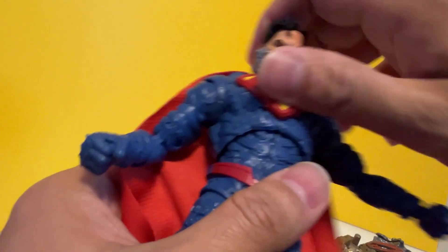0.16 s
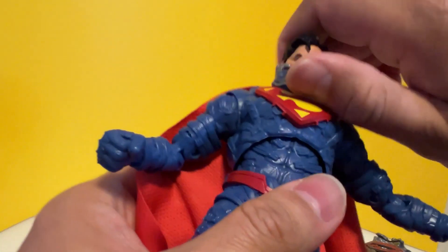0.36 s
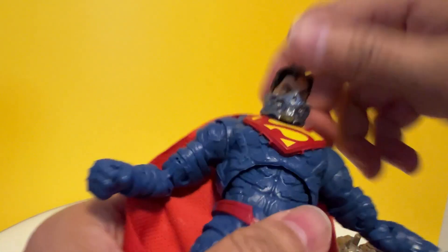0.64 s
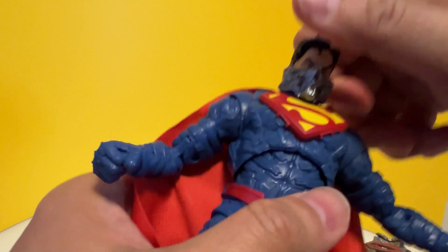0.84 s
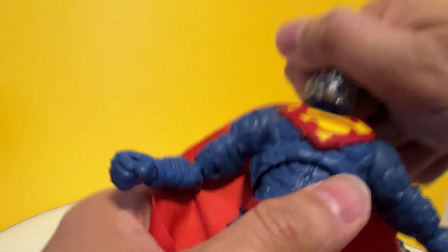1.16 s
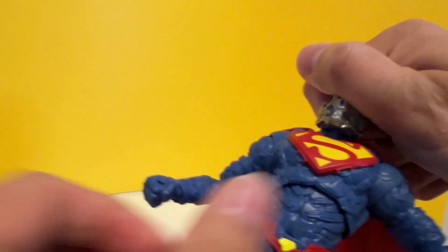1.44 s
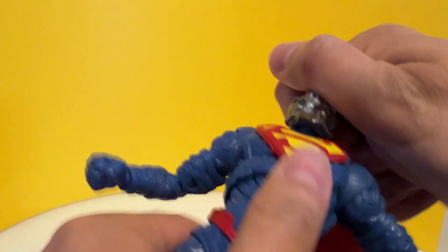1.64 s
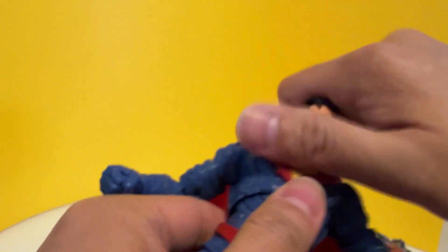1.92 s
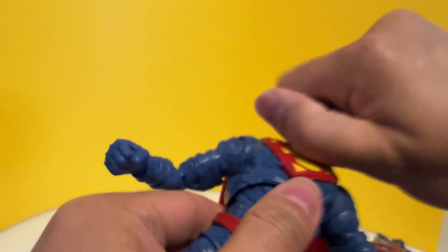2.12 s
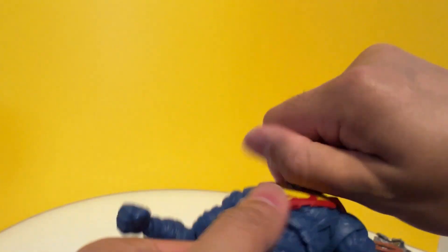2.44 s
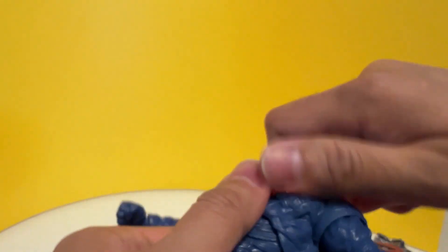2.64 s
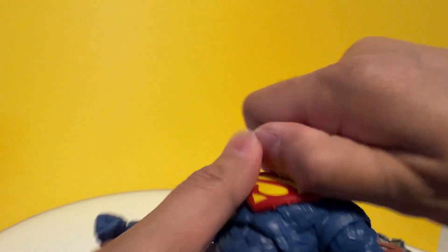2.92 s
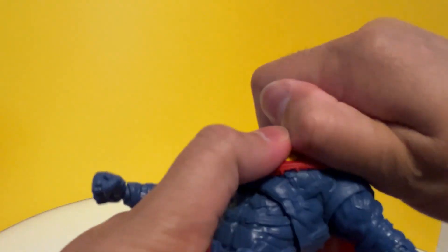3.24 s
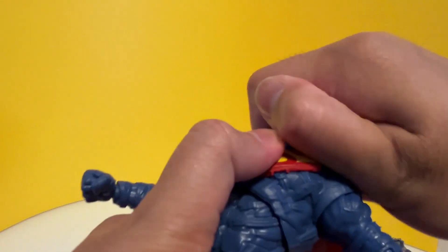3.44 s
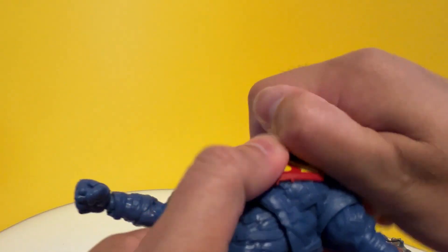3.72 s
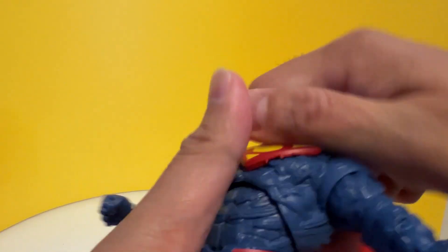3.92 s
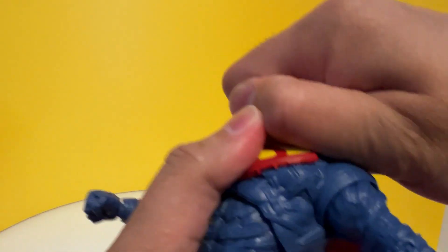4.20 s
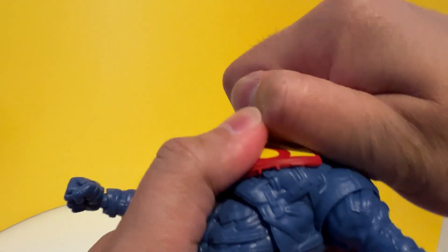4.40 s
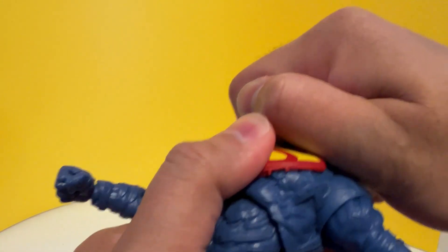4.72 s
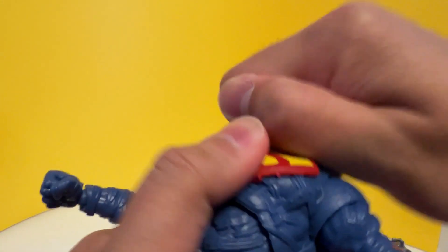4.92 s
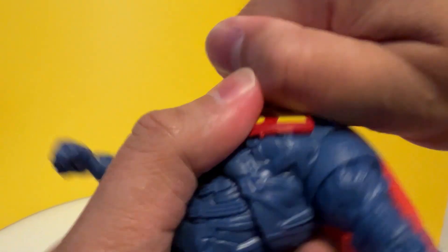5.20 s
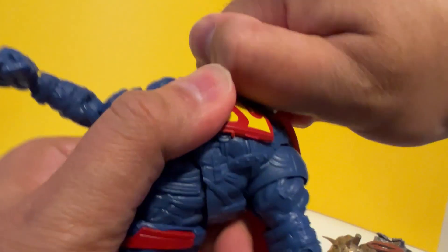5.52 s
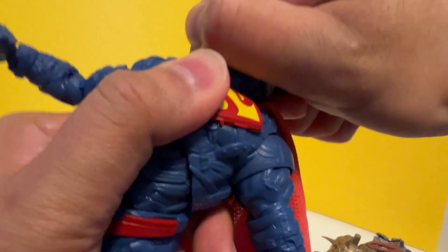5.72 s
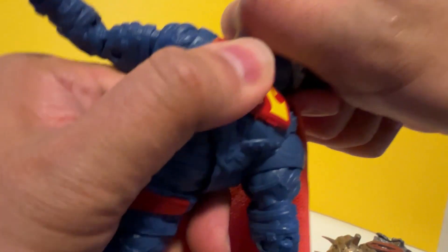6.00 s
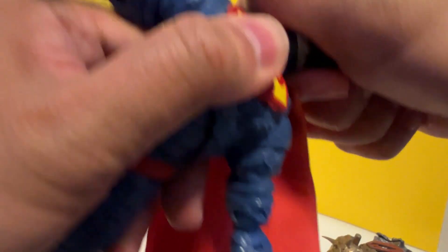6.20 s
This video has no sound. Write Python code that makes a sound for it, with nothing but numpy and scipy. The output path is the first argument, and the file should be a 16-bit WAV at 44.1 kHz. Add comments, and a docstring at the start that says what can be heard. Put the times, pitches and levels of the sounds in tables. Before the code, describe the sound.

A plastic toy figure is handled close to the microphone over a small room's faint rumble and hiss. For the first two seconds, fingers lightly tap and rub it, with a soft rustle of its cloth cape around 1.5 seconds. From about 2 seconds the hollow head is twisted on its tight neck peg: the joint sticks and slips in small, irregular clicks, each with a slight room echo. They bunch up around 3.5 seconds and grow stronger around 4.5. At 5 seconds two sharp plastic knocks come with a low table bump that briefly shakes the microphone stand. The clicks then crowd into a louder, brighter rasp until about 5.8 seconds. After a few more knocks and a rub, the head pops off at 6.2 seconds with one loud snap, followed by a couple of faint taps.

```python
"""Over a small room's low rumble and hiss, fingers tap and rub a plastic figure and its cloth cape.
From about 2 s a hand twists the hollow head on its tight neck peg: the joint sticks and slips in
single clicks, each answered by the room. At 5 s a bump of the table rocks the light stand of the
nearby camera, and the clicks crowd into a rasp. At 6.2 s the head pops off."""
import sys
import numpy as np
from scipy import signal
from scipy.fft import rfft, irfft, next_fast_len
from scipy.io import wavfile
from scipy.ndimage import map_coordinates

SR = 44100
rng = np.random.default_rng(int(sys.argv[2]) if len(sys.argv) > 2 else 0)


def file_out(sig):
    """Save sig as 16-bit WAV at sys.argv[1]."""
    # one column per channel
    cols = np.atleast_2d(sig).T
    # limit, then scale
    lim = np.clip(cols, -1, 1)
    pcm = np.round(lim * 32767).astype(np.int16)
    wavfile.write(sys.argv[1], SR, pcm)


N = 280167

# A mode is a tone at which a part rings. Those of the hollow head (low, high) and the hollow torso:
# (pitch [Hz], relative level [dB], time to fade by 60 dB [s])
HEAD_LOW_MODES = [(1842, -12, 0.0084), (2310, -6.5, 0.0075), (2914, 8, 0.012), (3180, -11, 0.022),
                  (3560, 3.5, 0.013), (3810, -13, 0.0074)]
HEAD_HIGH_MODES = [(4760, 1, 0.0073), (5520, 1, 0.0033), (6760, 0, 0.0057), (7860, -7, 0.011),
                   (8790, -7.5, 0.0039), (10000, -9.5, 0.0039), (11650, -15, 0.0038), (12900, -16, 0.003),
                   (14440, -19.5, 0.005), (15600, -22, 0.003)]
TORSO_MODES = [(538, -5, 0.014), (870, -2, 0.009), (1323, 8.5, 0.0063), (1933, 5.5, 0.014)]


def amp(db):
    """Turn a level in dB into a gain."""
    return 10 ** (np.asarray(db) / 20)


def unit(x):
    """Scale a signal to an average strength (rms) of 1."""
    return x / np.sqrt(np.mean(x ** 2) + 1e-20)


def along(points, hz):
    """Read between (pitch [Hz], value) points on a logarithmic pitch axis."""
    f, values = np.transpose(points)
    return np.interp(np.log(hz + 1), np.log(f + 1), values)


def wobble(rate):
    """A smooth random curve through `rate` new values a second."""
    return map_coordinates(rng.standard_normal(int(N * rate / SR) + 4), [np.arange(N) * rate / SR])


def filtered(x, response):
    """Give each frequency f in x the gain response(f)."""
    size = next_fast_len(N + SR // 2)
    return irfft(rfft(x, size) * response(np.fft.rfftfreq(size, 1 / SR)), size)[..., :N]


def noise(response):
    """Noise of strength 1, coloured by response(f)."""
    return unit(filtered(rng.standard_normal(N), response))


def shell_noise(modes, widen):
    """Noise through a shell's modes: the faster a mode fades, the wider its band of pitches."""
    bands = [(hz, db, widen * np.log(1000) / np.pi / fade_s) for hz, db, fade_s in modes]
    return noise(lambda f: np.sqrt(sum(amp(2 * db) / (1 + (2 * (f - hz) / width) ** 2) ** 2
                                       for hz, db, width in bands)))


def ring(times, levels_db, modes, attack_s, scatter_db, detune, favour_db=0, stretch=1, choke_s=0.008):
    """Each contact rings all modes at fresh strengths and pitches; the closing grip chokes the ring."""
    t = np.arange(SR // 40) / SR
    draw = rng.standard_normal((len(times), 2, len(modes), 1))
    favour_db = favour_db + np.zeros((len(times), len(modes), 1))
    burst = 0
    for k, (hz, db, fade_s) in enumerate(modes):
        envelope = amp(db + favour_db[:, k] + scatter_db * draw[:, 0, k] - 60 * t / fade_s)
        pitch = hz * stretch * (1 + detune * draw[:, 1, k])
        burst = burst + (-1) ** k * envelope * np.sin(2 * np.pi * pitch * t)
    burst = burst * (1 - np.exp(-(t / attack_s) ** 2)) * np.exp(-(t / choke_s) ** 2)
    onset_strength = np.sqrt(2 * np.mean(burst[:, :SR // 400] ** 2, axis=1, keepdims=True))
    burst *= amp(levels_db)[:, None] / onset_strength
    index = np.round(np.asarray(times) * SR).astype(int)[:, None] + np.arange(len(t))
    return np.bincount(index.ravel(), burst.ravel(), N + len(t))[:N]


def room_echo(x, wet_db):
    """The walls answer with a growing, then dying tail; the hands move, so each moment has a new one."""
    fade_s, wall_delay_s, build_s, treble_db_per_octave = 0.18, 0.0098, 0.0035, 2.03
    t, block = np.arange(SR // 4) / SR, SR // 20
    nearest_wall = 1 + 2 * np.exp(-((t - wall_delay_s) / 0.00016) ** 2)
    decay = amp(-60 * t / fade_s) * np.sqrt((1 - np.exp(-t / build_s)) * nearest_wall)
    pieces = np.pad(x, (0, -N % block)).reshape(-1, block)
    tails = rng.standard_normal((len(pieces), len(t))) * decay / np.linalg.norm(decay)
    echoes = signal.fftconvolve(pieces, tails, axes=1)
    index = block * np.arange(len(echoes))[:, None] + np.arange(echoes.shape[1])
    wet = np.bincount(index.ravel(), echoes.ravel())[:N]
    return filtered(wet, lambda f: amp(wet_db + treble_db_per_octave * np.log2((f + 1) / 3000)))


def room_noise():
    """The room's steady rumble and hiss."""
    # colour of the noise: (pitch [Hz], relative level [dB])
    colour = [(12, -51), (25, -8.5), (50, -3.5), (75, -14), (100, -20), (150, -19), (206, -27.5),
              (500, -33), (800, -38.5), (1700, -42), (4300, -47.5), (15500, -52.5), (16100, -75)]
    return amp(-49) * noise(lambda f: amp(along(colour, f)))


def camera_stand():
    """The stand trembles a little all the time; bumps swell into rocking that dies away."""
    # stand modes kept going by the floor's tremor: (pitch [Hz], width [Hz], level [dB])
    tremors = [(10.17, 5.8, -45.5), (46, 6.1, -52), (57.8, 11.7, -58), (120.7, 2.6, -67)]
    # bumped modes of stand and table: (time [s], pitch [Hz], level [dB], rise [s], 60 dB fade [s])
    bumps = [(5.055, 10.05, -3, 0.12, 1.71), (5.003, 72, -27.5, 0.0058, 0.78),
             (5.018, 44.4, -5.5, 0.076, 0.41), (4.995, 158, -38, 0.0097, 0.22),
             (0.56, 265, -51, 0.064, 0.56), (5.0, 21.3, -17, 0.059, 0.98),
             (3.116, 213, -37.5, 0.0012, 0.029), (6.083, 9.03, -15.5, 0.13, 1.4),
             (6.188, 107, -38, 0.0039, 0.13)]
    motion = sum(amp(db) * noise(lambda f: 1 / (1 + (2 * (f - hz) / width) ** 2))
                 for hz, width, db in tremors)
    for start, hz, db, rise_s, fade_s in bumps:
        t = np.maximum(np.arange(N) / SR - start, 0)
        envelope = amp(db - 60 * t / fade_s) * (1 - np.exp(-(t / rise_s) ** 2))
        motion = motion + envelope * np.sin(2 * np.pi * hz * t)
    return motion


def cape_rustle():
    """The holding hand slides over the cloth cape with a soft, uneven rustle."""
    # loudness of the slide: (time [s], level [dB])
    slide = [(1.44, -90), (1.46, -62.5), (1.7, -62), (1.87, -66.5), (2.0, -100), (3.24, -71), (3.33, -61),
             (3.65, -71.5), (5.2, -65), (5.35, -62), (5.7, -59), (5.9, -66)]
    # colour of the cloth: (pitch [Hz], relative level [dB])
    colour = [(200, -5), (500, -6.5), (780, -4.5), (1050, -11.5), (1320, -9), (1800, -32)]
    slide_db = np.interp(np.arange(N) / SR, *np.transpose(slide))
    return amp(slide_db + 1.9 * wobble(25)) * noise(lambda f: amp(along(colour, f)))


def rubbing():
    """Each rub is a swell of grainy friction noise, heard through the head's shell."""
    # rubs of skin and plastic: (start [s], length [s], level [dB], high modes over level [dB])
    rubs = [(0.096, 0.16, -72, -1), (1.159, 0.041, -71, 2.5), (1.222, 0.05, -59, -7),
            (1.465, 0.072, -65, -10), (1.58, 0.11, -57, -7.5), (1.656, 0.036, -66, 12),
            (1.715, 0.05, -59, -10), (1.902, 0.041, -59, -6), (2.431, 0.057, -58, -6.5),
            (2.597, 0.083, -63, 0), (2.77, 0.2, -61.5, -9), (3.475, 0.04, -42, -3), (3.845, 0.25, -62, -3),
            (4.174, 0.11, -60, -19), (4.852, 0.13, -56.5, -6), (5.059, 0.03, -44, -9.5),
            (5.996, 0.09, -55.5, -8), (6.186, 0.049, -52, -13)]
    t, low_swell, high_swell = np.arange(N) / SR, np.zeros(N), np.zeros(N)
    for start, length, db, high_db in rubs:
        swell = amp(db) * np.sin(np.pi * np.clip((t - start) / length, 0, 1)) ** 0.5
        low_swell += swell
        high_swell += amp(high_db) * swell
    clumps = unit(amp(5.1 * wobble(160) + 1.8 * wobble(35)))
    low = low_swell * shell_noise(HEAD_LOW_MODES, widen=2)
    high = high_swell * shell_noise(HEAD_HIGH_MODES, widen=2)
    return clumps * (low + high)


def strike(hits, scatter_db):
    """The struck spot favours the head's modes near one pitch and also sounds the torso."""
    times, db, pitch_hz, high_db, torso_db = np.transpose(hits)
    hz, mode_db, _ = np.transpose(HEAD_LOW_MODES)
    favour_db = -.6 * mode_db - np.minimum(45 * np.abs(np.log(hz / pitch_hz[:, None])), 12)
    edge_db = 0.54 * np.log2(np.transpose(HEAD_HIGH_MODES)[0] / 5000)  # hard edges favour the top modes
    held_modes = [(f, level, 0.82 * fade_s) for f, level, fade_s in HEAD_LOW_MODES]  # fingers damp them
    low = ring(times, db - 4.5, held_modes, attack_s=0.00031, scatter_db=scatter_db,
               detune=0.044, favour_db=favour_db[..., None])
    high = ring(times, db + high_db - 8.0, HEAD_HIGH_MODES, attack_s=0.00019, scatter_db=scatter_db,
                detune=0.058, stretch=1.029, favour_db=edge_db[:, None])
    torso = ring(times, db + torso_db - 0.5, TORSO_MODES, attack_s=0.00084, scatter_db=scatter_db,
                 detune=0.081, choke_s=0.0095)
    direct = low + high + torso
    return direct + room_echo(direct, wet_db=-8)


def knocks():
    """Fingers and parts knock against the figure and make it ring."""
    # knocks: (time [s], level [dB], favoured pitch [Hz], high mode boost [dB], torso boost [dB])
    hits = [(.403, -43.5, 3590, -10, -19), (0.4292, -48, 3250, 1, -24), (0.457, -44, 3200, -3, -25),
            (0.9822, -43.5, 3730, 2, -26), (1.029, -41, 3260, 1, -27), (1.038, -32.5, 3470, 3.5, -37),
            (1.0493, -39, 3050, 0, -15), (1.33, -39.5, 3330, 2, -28), (1.4566, -37.5, 3230, 3, -4.5),
            (1.5442, -44.5, 3370, 4, -18), (1.561, -40, 3080, -14, -27), (1.6006, -34, 2530, 1, -32),
            (1.6939, -38.5, 3420, -17, -13), (1.7188, -39, 3020, -1.5, -17),
            (4.9924, -16.5, 3150, -7.5, -16), (5.0006, -20.5, 3200, 2, -9.5), (5.018, -42, 3160, -6, 6),
            (5.072, -26.5, 3170, -10, -10.5), (5.9431, -23.5, 3940, 9.5, -38),
            (5.975, -27.5, 3470, 1.5, -19), (5.9883, -29, 2760, -21, -16), (6.0949, -37.5, 2730, 9.5, -16),
            (6.3054, -33, 2040, -3.5, -11), (6.3156, -37.5, 2300, 0, -8)]
    return strike(hits, scatter_db=3)


def slips():
    """Times and levels of the joint's slips; each lets go in two jerks, the second one weaker."""
    # distinct slips: (time [s], level [dB])
    single_slips = [(1.9494, -31), (2.0533, -33), (2.0644, -36), (2.197, -37.5), (2.3214, -31.5),
                    (2.5414, -33.5), (2.575, -36.5), (2.6326, -27.5), (2.638, -32), (2.7333, -28.5),
                    (2.8087, -37), (2.9008, -43.5), (2.9332, -38), (2.9873, -26), (2.9982, -26),
                    (3.051, -28), (3.1172, -45), (3.1566, -32.5), (3.1738, -32), (3.191, -36.5),
                    (3.276, -39), (3.2901, -33.5), (3.297, -31), (3.3055, -33), (3.3135, -29),
                    (3.3498, -31), (3.354, -35), (3.357, -29), (3.3762, -33), (3.3917, -27.5),
                    (3.3978, -30), (3.403, -24.5), (3.411, -33), (3.4156, -30), (3.4192, -28.5),
                    (3.432, -36), (3.4397, -31.5), (3.4647, -32), (3.472, -29.5), (3.4786, -21.5),
                    (3.4896, -29), (3.502, -33), (3.5085, -32), (3.5174, -33), (3.5493, -30.5),
                    (3.5556, -29), (3.5634, -28.5), (3.575, -27.5), (3.666, -36), (3.696, -24.5),
                    (3.8008, -39), (4.101, -29.5), (4.143, -33), (4.178, -35.5), (4.1923, -32.5),
                    (4.213, -36), (4.2213, -33), (4.2577, -31), (4.265, -38), (4.2745, -41), (4.2807, -26),
                    (4.302, -28.5), (4.328, -40), (4.359, -32), (4.363, -32), (4.378, -36.5), (4.412, -35),
                    (4.416, -17.5), (4.4307, -29.5), (4.486, -36), (4.494, -23), (4.502, -32.5),
                    (4.5586, -34), (4.562, -35), (4.567, -29), (4.5838, -19.5), (4.5905, -29),
                    (4.5978, -21.5), (4.6858, -17.5), (4.7487, -16), (4.7596, -30), (4.813, -34),
                    (4.847, -32.5), (4.8676, -46), (4.8832, -30.5), (4.898, -38), (4.915, -35.5),
                    (4.93, -27.5), (5.125, -23.5), (5.1405, -24), (5.15, -22.5), (5.2252, -28),
                    (5.2399, -33), (5.2694, -20.5), (5.2925, -20.5), (5.314, -20.5), (5.3488, -19.5),
                    (5.386, -18), (5.393, -18.5), (5.4602, -19.5), (5.4667, -20), (5.4778, -22),
                    (5.495, -17.5), (5.5078, -22.5), (5.5141, -24), (5.5324, -19.5), (5.539, -21),
                    (5.5682, -19.5), (5.6062, -17), (5.6188, -20), (5.6384, -18.5), (5.6623, -20),
                    (5.675, -23), (5.693, -19), (5.704, -24.5), (5.7125, -24), (5.7206, -25.5),
                    (5.7583, -27.5), (5.7773, -24.5), (5.784, -24), (5.8136, -30), (5.8322, -31.5),
                    (5.849, -30)]
    # runs of small, uneven slips: (start [s], length [s], rate [slips/s], mean level [dB])
    runs = [(2.377, 0.16, 23, -51.5), (4.283, .05, 120, -39.5)]
    unevenness, spread_db = 0.32, 8
    rows = [np.array(single_slips)]
    for start, length, rate, db in runs:
        draw = rng.standard_normal((40, 2))
        t = (np.arange(40) + .5 + unevenness * np.tanh(draw[:, 0]) / 2) / rate
        rows.append(np.transpose([start + t, db + spread_db * draw[:, 1]])[t < length])
    times, db = np.concatenate(rows).T
    jerk_delay_s = .0014 * rng.uniform(.7, 1.3, len(times))
    return np.r_[times, times + jerk_delay_s], np.r_[db, db - 4]


def neck_joint():
    """The joint sticks, then slips with a click: high modes crack first, low ones swell just after."""
    # fingers and angle reshape the shell:
    # (time [s], low mode pitch [x], high mode pitch [x], boost of low modes above the strongest [dB])
    grip = [(1.899, 1.006, 1.04, -9), (2.6, 1.036, 1.065, -9.5), (3.2, 1.02, 1.064, -4.5),
            (3.5, 1.032, 1.02, 0), (4.3, 1.02, 1.032, -2.5), (4.85, 0.98, 1.066, -0.5),
            (5.13, 0.96, 1.004, 8), (5.35, 1.034, 1.027, -2.5), (5.86, 1.054, 0.96, 1)]
    # the tighter the joint is wrung, the brighter it cracks: (time [s], high mode boost [dB])
    brightness = [(1.9, -5), (2.6, -8), (3.15, -10), (3.3, -15), (3.5, -5), (3.75, -13), (4.3, -10),
                  (4.6, -5), (4.75, -3), (4.85, -10.5), (4.95, -9.5), (5.12, 6), (5.4, -1.5), (5.55, 3.5),
                  (5.7, -0.5), (5.86, 5)]
    pitch_scatter, hardness, peg_to_torso_db = 0.022, 0.2, -26.5
    times, db = slips()
    grip_times, *columns = np.transpose(grip)
    low_pitch, high_pitch, boost_db = [np.interp(times, grip_times, c)[:, None] for c in columns]
    low_pitch = low_pitch * (1 + pitch_scatter * rng.standard_normal((len(times), 1)))
    hz, mode_db, _ = np.transpose(HEAD_LOW_MODES)
    # modes below the strongest one move slightly the opposite way
    boost_db = boost_db * np.where(hz > hz[mode_db.argmax()], 1, -.2) * (mode_db < mode_db.max())
    high_db = np.interp(times, *np.transpose(brightness)) + rng.standard_normal(len(times))
    octaves = np.log2(np.transpose(HEAD_HIGH_MODES)[0] / 5000)
    treble_db = hardness * np.outer(db - db.mean(), octaves)  # stronger slips are harder: more treble
    torso = ring(times, db + peg_to_torso_db, TORSO_MODES, attack_s=0.0011, scatter_db=-3.0, detune=0.11)
    low = ring(times, db - 4.5, HEAD_LOW_MODES, attack_s=0.00064, choke_s=0.0041, scatter_db=2.5,
               detune=0.011, favour_db=boost_db[..., None], stretch=low_pitch)
    high = ring(times, db + high_db - 6.0, HEAD_HIGH_MODES, attack_s=0.0002, scatter_db=1.5,
                detune=0.015, favour_db=treble_db[..., None], stretch=high_pitch)
    direct = low + high + torso
    return direct + room_echo(direct, wet_db=-9)


def head_pop():
    """The head leaves the peg with one loud snap that rings head and torso."""
    # the pop: (time [s], level [dB], favoured pitch [Hz], high mode boost [dB], torso boost [dB])
    pop = [(6.1976, -5.5, 3470, -10, -13.5)]
    return strike(pop, scatter_db=1)


def scene():
    """All sources add up at one microphone."""
    figure = neck_joint() + knocks() + head_pop() + rubbing() + cape_rustle()
    return (figure + camera_stand() + room_noise())[None]


def record(dry):
    """The highest treble fades near 16 kHz, and nothing is heard above 16.6 kHz."""
    droop_hz, limit_hz = 16000, 16600
    return filtered(dry, lambda hz: (hz < limit_hz) / (1 + (hz / droop_hz) ** 40))


dry = scene()
out = record(dry)
file_out(out)
```